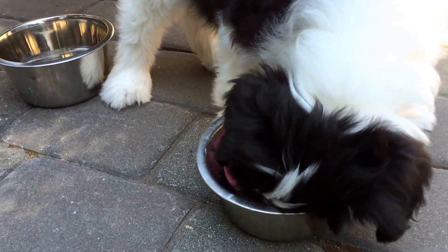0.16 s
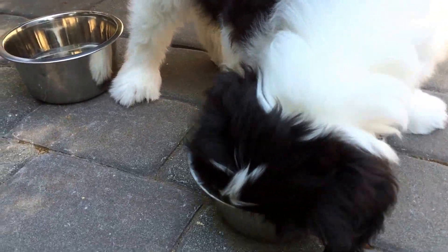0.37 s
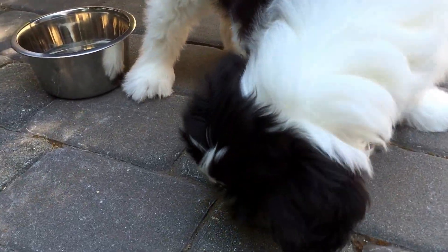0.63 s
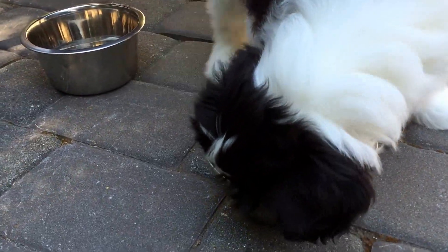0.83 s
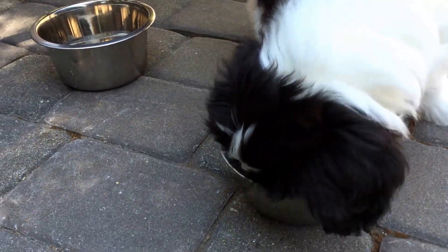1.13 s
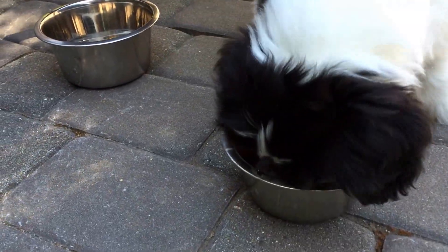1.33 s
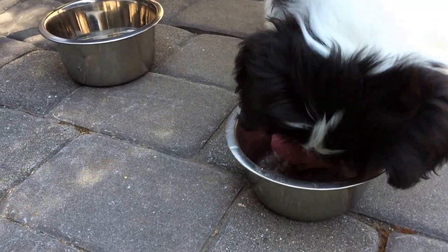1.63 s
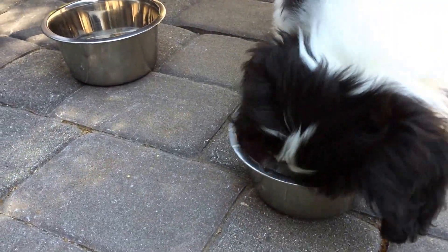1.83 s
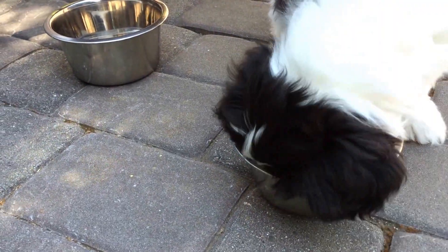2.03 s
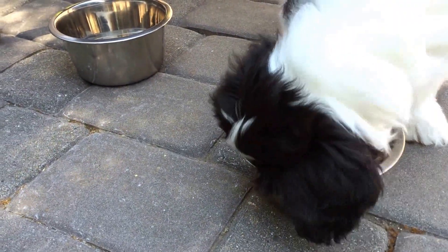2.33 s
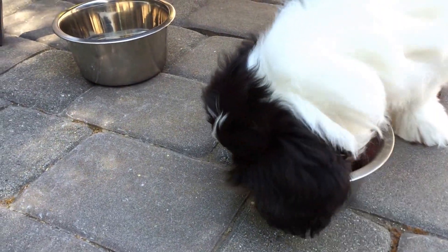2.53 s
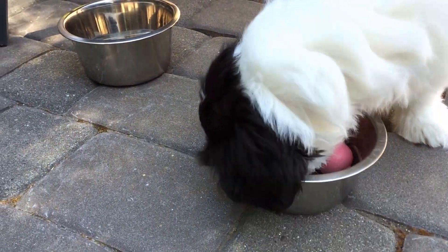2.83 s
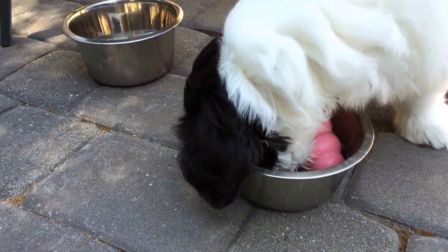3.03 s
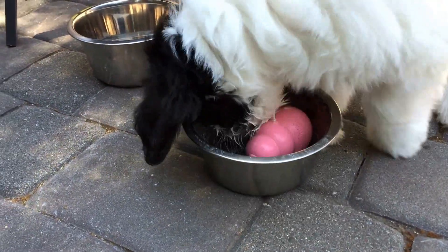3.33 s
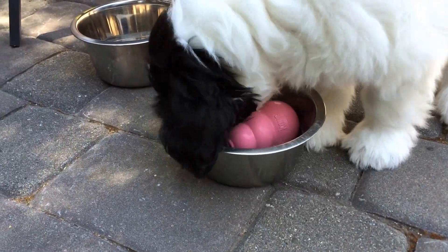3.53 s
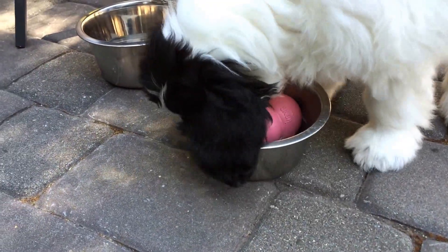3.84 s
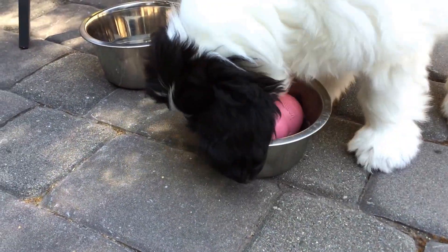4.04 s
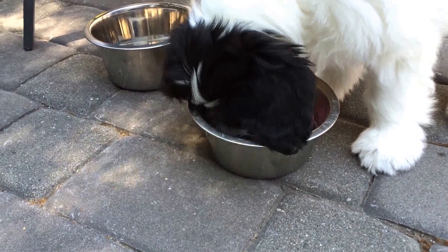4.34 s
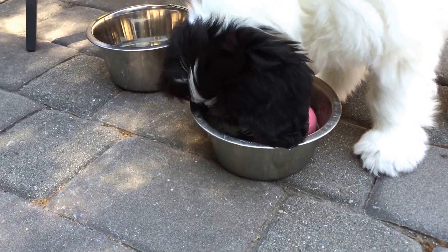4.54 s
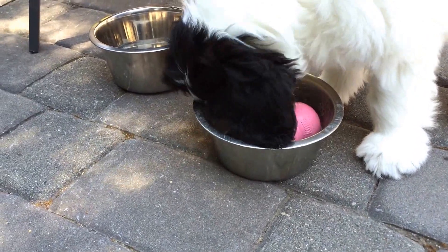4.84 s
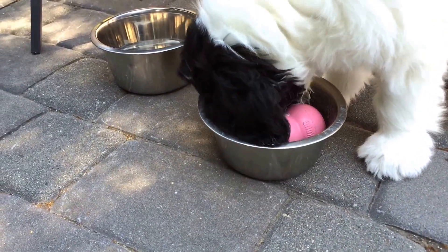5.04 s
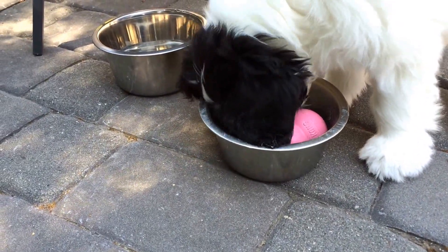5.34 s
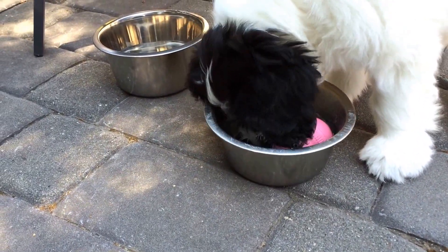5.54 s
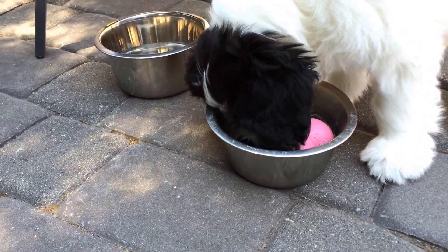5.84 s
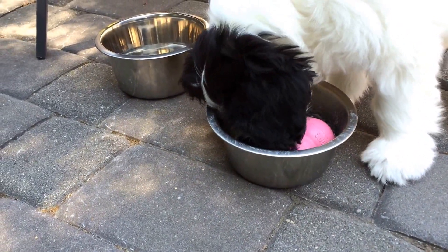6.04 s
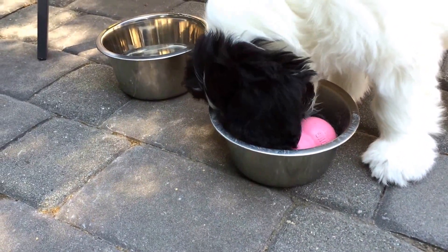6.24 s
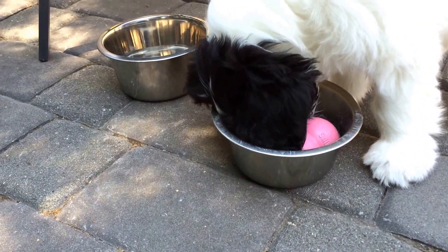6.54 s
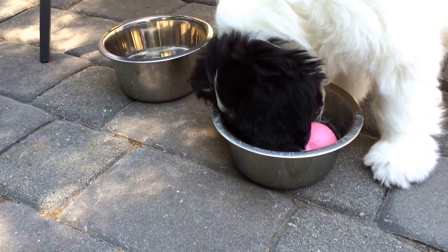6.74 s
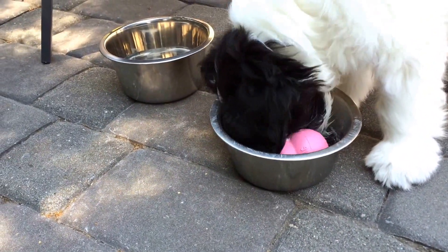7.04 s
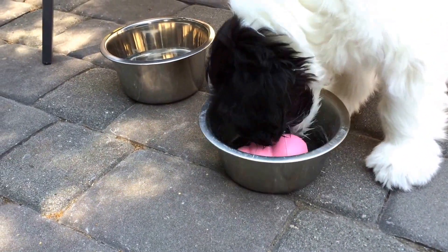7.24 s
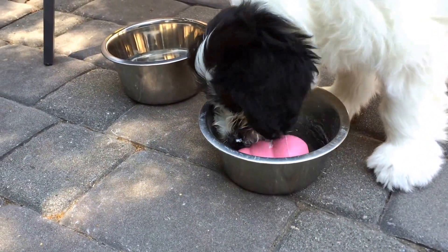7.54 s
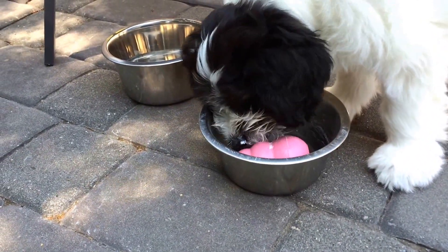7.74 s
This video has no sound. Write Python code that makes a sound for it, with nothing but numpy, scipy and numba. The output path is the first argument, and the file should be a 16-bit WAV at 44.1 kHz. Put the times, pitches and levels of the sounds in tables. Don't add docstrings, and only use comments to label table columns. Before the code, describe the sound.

Outdoors, a puppy's metal food bowl skids and chatters on paving, a rubber toy thudding inside it, quiet gaps between bursts of scraping.

```python
import sys
import numpy as np
from scipy import signal
from scipy.fft import rfft, irfft
from scipy.io import wavfile
from scipy.ndimage import uniform_filter1d
from numba import njit

SR = 44100
rng = np.random.default_rng(int(sys.argv[2]) if len(sys.argv) > 2 else 0)


def natural_amplitude(level_db):
    exponent = np.asarray(level_db, float) / 20
    return 10 ** exponent


def store_wav(level_fs):
    pcm = np.round(np.clip(np.atleast_2d(level_fs), -1, 1) * 32767)
    wavfile.write(sys.argv[1], SR, pcm.T.astype(np.int16))


N = 347508


def level(x, db):
    return x * natural_amplitude(db) / np.sqrt(np.mean(x ** 2))


def walks(count, rate, hop):
    k = max(int(SR / rate / hop), 1)
    w = rng.standard_normal((count, N // hop + 1))
    w = uniform_filter1d(uniform_filter1d(w, k, axis=1), k, axis=1)
    return w / w.std()


def filtered_noise(gain):
    return irfft(rfft(rng.standard_normal(N)) * gain, N)


def grit(rate, spread_db, smooth):
    size_db = np.minimum(spread_db * rng.exponential(size=N), 10)
    clicks = (rng.random(N) < rate / SR) * natural_amplitude(size_db) * rng.standard_normal(N)
    return level(level(clicks, 0) + smooth * rng.standard_normal(N), 0)


def thuds(table, db, push_s, upper, upper_db):
    out, u = np.zeros(N), np.arange(8192) / SR
    for s, peak_db, hz, t60 in table:
        tone = np.sin(2 * np.pi * hz * u) + natural_amplitude(upper_db) * np.sin(2 * np.pi * upper * hz * u)
        decay = natural_amplitude(db + peak_db - 60 * u / max(t60, .005))
        i = int(s * SR)
        out[i:i + len(u)] += decay * (1 - np.exp(-u / push_s)) * tone
    return out


# [f/Hz, level/dB per Hz]
MURMUR_TILT = [(15, -31.5), (25, -6.5), (153, -4), (236, -8), (285, -13.5), (373, -18.5), (659, -25),
               (1070, -22), (1230, -28), (1330, -23.5), (2220, -31.5), (3620, -42.5), (14000, -52.5),
               (16000, -55.5)]
# [f/Hz, width/Hz, level/dB]
MOTOR_HUM = [(86.9, 6.5, -58.5), (126.1, 7.1, -60.5)]


def outdoors():
    f = np.fft.rfftfreq(N, 1 / SR) + 1
    hz, db = np.transpose(MURMUR_TILT)
    tilt = natural_amplitude(np.interp(np.log(f), np.log(hz), db))
    t, swell, murmur = np.arange(N) / 256, walks(1, .6, hop=256)[0], np.zeros(N)
    for centre in np.arange(4.5, 14.5, .5):
        band = filtered_noise(tilt * np.sqrt(np.clip(1 - abs(np.log2(f) - centre) * 2, 0, 1)))
        wander_db = 0.34 * swell + 1.1 * walks(1, 11, hop=256)[0]
        murmur += band * natural_amplitude(np.interp(t, np.arange(len(swell)), wander_db))
    hum = np.zeros(N)
    for hz, width_hz, db in MOTOR_HUM:
        hum += level(filtered_noise(1 / (1 + ((f - hz) / (width_hz / 2)) ** 2)), db)
    return level(murmur, -52) + hum


# [nearest t/s, level/dB, half-loudness time/s]
PASSING_TRAFFIC = [
    (.8, -54, 0.18),
    (1.502, -47.5, 0.15),
    (3.3, -55, 1),
    (5.05, -64, 0.1),
    (6.58, -46.5, 0.19),
    (7.6, -59.5, 0.75),
]
# [t/s, level/dB]
BASE_JOLTS = [(.55, -46), (2.622, -40.5), (2.84, -43), (2.91, -37), (3.07, -37.5), (3.43, -39.5),
              (3.53, -43), (3.92, -48), (4.11, -44), (4.39, -46), (5.56, -36.5), (7.13, -46)]


def groan():
    t = np.arange(N) / SR
    rise_db_s, fall_db_s = 492.5, 222
    jolts = sum(natural_amplitude(db - np.maximum(rise_db_s * (s - t), fall_db_s * (t - s))) for s, db in BASE_JOLTS)
    swells = sum(natural_amplitude(db) / (1 + ((t - s) / half) ** 2) for s, db, half in PASSING_TRAFFIC)
    rub = signal.sosfilt(signal.butter(3, [250, 530], "band", fs=SR, output="sos"), grit(600, 1.5, 0.82))
    return level(rub, -10.0) * (jolts + swells)


# [t/s, peak level/dB, ring f/Hz, t60/s]
BUMP_EVENTS = [
    (2.5915, -27, 100, 0.05),
    (2.624, -29, 96, 0.029),
    (2.6492, -27, 125, 0.06),
    (2.691, -37.5, 80.5, 0.06),
    (2.719, -35, 96, 0.059),
]


def phone_bumps():
    boom = thuds(BUMP_EVENTS, 2.5, push_s=0.0011, upper=3.04, upper_db=-18)
    return np.roll(boom, -150)


# [t/s, peak level/dB, ring f/Hz,
# t60/s]
TOY_KNOCKS = [(0.541, -14, 765, 0.019), (0.607, -17, 680, 0.034), (.541, -20, 1130, .015),
              (2.592, -22, 930, 0.022), (2.846, -24.5, 530, 0.061), (2.902, -16.5, 760, 0.026),
              (2.919, -24.5, 923, 0.042), (2.927, -23, 715, .02), (3.424, -34, 545, 0.059),
              (3.516, -22, 415, 0.085), (3.594, -11, 763, 0.019), (4.1105, -20, 600, 0.045),
              (4.117, -23, 1020, .02), (4.136, -26.5, 556, 0.039), (4.1362, -18, 1100, 0.018),
              (5.418, -29.5, 625, 0.015), (7.126, -23.5, 334, 0.04), (2.0992, -28, 800, .025),
              (2.0828, -37, 570, .025), (2.1362, -35, 600, .035), (7.1268, -19, 1400, .022)]


def toy_knocks():
    return thuds(TOY_KNOCKS, -4, push_s=0.0015, upper=1.3, upper_db=-13.0)


# [t/s, peak level/dB, ring f/Hz, t60/s]
CLEAN_TAPS = [(1.1056, -17, 1596, .072), (1.1056, -30, 1624, .17), (1.1056, -35, 3052, .07),
              (1.1056, -40, 8520, .1), (1.648, -35, 1710, .05), (2.477, -27, 1595, .09),
              (.432, -30, 2250, .04), (6.479, -33, 1200, .03), (6.86, -33, 1150, .05),
              (6.883, -25, 1175, .05), (7.262, -26, 600, .06), (3.594, -27, 3300, .015),
              (3.594, -27, 2100, .015), (1.1052, -27, 2540, .035), (4.11, -25, 1900, .035),
              (4.99, -44, 3150, .018)]


def clinks():
    return thuds(CLEAN_TAPS, -4, push_s=0.0014, upper=1.8, upper_db=-48)


# [start t/s, length/s, level/dB, f/Hz]
LOW_SONGS = [(0.076, 0.042, -45, 1035), (0.122, 0.079, -44, 1154), (0.13, 0.038, -39, 830),
             (0.184, 0.019, -49.5, 700), (0.196, 0.029, -51, 840), (0.269, 0.046, -42, 833),
             (0.272, 0.069, -50, 1225), (0.304, 0.063, -43.5, 683), (0.572, 0.028, -47, 1015),
             (0.704, 0.022, -55.5, 1160), (1.045, 0.062, -56, 930), (2.476, 0.017, -53, 1120),
             (2.56, 0.031, -47.5, 960), (2.798, 0.03, -49, 890), (2.976, 0.023, -56, 880),
             (3.06, 0.03, -39.5, 900), (3.183, 0.035, -40, 964), (3.201, 0.083, -49, 560),
             (3.319, 0.15, -48, 690), (3.348, 0.045, -37, 954), (3.643, 0.03, -57, 610),
             (3.94, 0.058, -54.5, 1080), (4.196, 0.036, -52, 580), (4.297, 0.031, -51.5, 700),
             (4.404, 0.019, -49, 625), (5.543, 0.028, -43.5, 1088), (5.572, 0.022, -40.5, 660),
             (5.582, 0.038, -42.5, 1150), (6.239, 0.02, -45.5, 1240), (6.595, 0.028, -54, 1200)]
# [start t/s, length/s, level/dB, f/Hz]
MID_SONGS = [(0.098, 0.042, -39.5, 1490), (0.12, 0.042, -40, 1680), (0.246, 0.032, -44, 1700),
             (0.309, 0.04, -37.5, 1598), (0.373, 0.039, -46, 1804), (0.433, 0.02, -44.5, 1350),
             (0.491, 0.03, -55, 1830), (0.543, 0.028, -44, 1690), (0.581, 0.041, -54, 1680),
             (0.675, 0.03, -49.5, 1540), (0.846, 0.02, -48.5, 1585), (0.884, 0.022, -53.5, 1490),
             (2.102, 0.006, -53, 1576), (2.5, 0.025, -44.5, 1430), (2.806, 0.022, -42, 1517),
             (2.838, 0.024, -43.5, 1550), (3.131, 0.023, -41, 1440), (3.137, 0.027, -35.5, 1657),
             (3.19, 0.047, -37, 1535), (3.257, 0.026, -38, 1560), (3.293, 0.076, -44, 1380),
             (3.304, 0.025, -39, 1650), (3.36, 0.052, -43, 1930), (3.402, 0.029, -39.5, 1703),
             (3.418, 0.036, -45.5, 1930), (3.45, 0.037, -43.5, 1790), (3.488, 0.035, -46.5, 1600),
             (3.522, 0.021, -47, 1930), (3.582, 0.045, -45.5, 1450), (3.618, 0.024, -40.5, 1630),
             (4.298, 0.03, -55, 1940), (4.421, 0.026, -49, 1610), (5.554, 0.021, -44, 1460),
             (5.571, 0.033, -40, 1710), (7.206, 0.032, -40, 1537), (7.228, 0.063, -41, 1670),
             (7.244, 0.03, -44, 1870), (7.289, 0.032, -43, 1406)]
# [start t/s, length/s, level/dB, f/Hz]
WALL_SONGS = [(0.08, 0.026, -51, 3320), (0.089, 0.028, -43, 3000), (0.094, 0.028, -41, 2360),
              (0.122, 0.03, -40, 2090), (0.277, 0.03, -44.5, 3030), (0.303, 0.032, -42, 2570),
              (0.311, 0.024, -48, 3520), (0.335, 0.032, -54, 3940), (0.349, 0.021, -46, 2500),
              (0.392, 0.026, -46, 2460), (0.411, 0.026, -55, 2780), (0.429, 0.022, -54, 3700),
              (0.462, 0.022, -56, 2500), (0.461, 0.03, -52, 3850), (3.143, 0.054, -46, 3110),
              (3.159, 0.081, -44.5, 3660), (3.253, 0.056, -47, 2970), (3.306, 0.021, -46, 3050),
              (3.348, 0.022, -50, 3040), (3.402, 0.02, -44, 3470), (3.42, 0.03, -53, 3100),
              (3.448, 0.021, -49, 3290), (3.497, 0.012, -52, 3400), (3.525, 0.015, -54, 3670),
              (3.596, 0.021, -46, 2070), (3.624, 0.026, -50, 2260), (7.11, 0.006, -53, 2250),
              (5.555, 0.02, -54, 2520), (5.568, 0.025, -46.5, 3060), (5.581, 0.026, -51, 2350),
              (6.883, 0.028, -55, 3980), (7.2, 0.058, -48, 2070), (7.238, 0.028, -44.5, 2315),
              (7.272, 0.021, -40, 2690)]
# [start t/s, length/s, level/dB, f/Hz]
THIN_SONGS = [(2.6, .11, -60, 1930), (4.86, .13, -64, 7100), (4.99, .14, -61.5, 7100),
              (5.0, .13, -58, 1880), (4.91, .04, -55, 1200), (2.1, .03, -56, 560), (4.815, .06, -64, 7100),
              (2.775, 0.026, -55, 3700), (4.435, .05, -56, 1600), (7.27, .03, -42.5, 850),
              (3.11, 0.028, -41, 1380), (.425, .025, -43.5, 2300)]


def sings():
    out, u = np.zeros(N), np.arange(8192) / SR
    t60_s, stretch, lead_s = 0.061, 1.08, .005
    for table in (LOW_SONGS, MID_SONGS, WALL_SONGS, THIN_SONGS):
        for s, length, db, hz in table:
            noise = rng.standard_normal(len(u))
            force = noise * abs(noise) * np.sin(np.pi * np.clip(u / (length * stretch), 0, 1))
            pole = np.exp(2j * np.pi * hz / SR - np.log(1000) / (t60_s * SR))
            swing = signal.lfilter([1], [1, -pole], force).imag
            loudest = np.sqrt(uniform_filter1d(swing ** 2, 800).max())
            i = int((s - lead_s) * SR)
            out[i:i + len(u)] += natural_amplitude(db) * swing / loudest
    return out


# [start t/s, length/s, rim level/dB, body minus rim level/dB, freest body ring f/Hz]
FREE_SLIDES = [(-.06, 0.12, -46.5, 2, 785), (.055, 0.17, -37.5, 2.5, 850), (.17, 0.14, -49.5, 7, 1110),
               (.245, 0.13, -41.5, 2, 1640), (.29, 0.12, -40, 1, 790), (.38, 0.15, -39, -2, 1390),
               (.67, 0.095, -58.5, 10, 1360), (.83, 0.084, -56, 9.5, 1500), (.99, 0.061, -65, 12, 1210),
               (4.188, 0.045, -48.5, 6, 730), (5.538, 0.077, -41.5, 4.5, 1150), (5.57, 0.07, -49, 8.5, 734),
               (5.83, 0.061, -63.5, 11, 810), (6.27, 0.088, -64.5, 6, 880), (6.47, 0.045, -64, 11, 1180),
               (6.56, .13, -59.5, 8.5, 1200), (6.855, 0.076, -48.5, 7.5, 1260),
               (7.135, 0.085, -51, 12, 1300), (7.175, 0.12, -41, 6, 1360), (7.22, 0.077, -35, 0, 600),
               (7.255, 0.071, -39.5, 5, 1380)]
# [start t/s, length/s, rim level/dB, body minus rim level/dB, freest body ring f/Hz]
BRUSHED_SLIDES = [(1.8, 0.1, -59.5, 5, 1105), (2.4, 0.071, -62.5, 10, 1410), (2.459, 0.11, -45, 4.5, 1370),
                  (2.8, 0.099, -43.5, 5, 1080), (2.97, 0.079, -60.5, 8, 890), (3.1, 0.13, -35, -1.3, 1490),
                  (3.17, 0.1, -36, 3.5, 1490), (3.23, 0.16, -35, 1, 1390), (3.33, 0.1, -33.5, -0.5, 1216),
                  (3.389, 0.12, -38.5, -2, 1620), (3.589, 0.08, -36.5, -1.5, 1030),
                  (3.78, 0.14, -66.5, 2, 740), (4.098, 0.068, -45, 6, 780), (4.37, 0.1, -51.5, 5.5, 1210),
                  (4.9, 0.23, -61, 5, 980), (6.2, 0.054, -58.5, 16.5, 630), (6.225, 0.058, -54, 6, 1140),
                  (7.42, 0.066, -64, -8, 830)]
# [start t/s, length/s, rim level/dB, body minus rim level/dB, freest body ring f/Hz]
PRESSED_SLIDES = [(.49, 0.145, -39.5, -4.5, 800), (.56, 0.045, -52, -3, 1010), (.6, 0.082, -50.5, 9.5, 750),
                  (1.04, 0.1, -53, 6, 1290), (1.2, 0.087, -64, 8, 930), (2.081, 0.042, -53, 3, 800),
                  (2.134, 0.022, -57, 5, 754), (2.52, 0.13, -46, 6, 791), (2.68, 0.068, -63, 1, 800),
                  (2.74, 0.12, -48, 1, 1140), (2.88, 0.082, -44.5, 3, 710), (3.04, 0.19, -37.5, -3, 930),
                  (3.48, 0.25, -38, -2.5, 764), (3.67, 0.12, -54, 4, 980),
                  (3.925, 0.075, -45.5, -6.5, 1050), (3.96, 0.12, -55, -3, 1040),
                  (4.261, 0.054, -52.5, -2, 780), (4.285, 0.076, -42, -4, 790), (4.81, 0.21, -60, 6, 864),
                  (5.02, 0.125, -53.5, 3, 840), (6.085, 0.067, -59.5, 8, 725),
                  (7.61, 0.095, -53.5, 3, 1090)]


def strokes():
    power, focus, weight = np.zeros((3, N)), np.zeros(N), np.zeros(N)
    t = np.arange(N) / SR
    for table, wall_db, lean in ((FREE_SLIDES, -2.5, 0.88), (BRUSHED_SLIDES, -7.5, 0.77),
                                 (PRESSED_SLIDES, -16, 0.72)):
        for s, length, rim_db, body_db, hz in table:
            span = slice(max(int(s * SR), 0), int((s + length) * SR))
            speed = abs(np.sin(np.pi * np.clip((t[span] - s) / length, 0, 1) ** lean))
            part_gain = natural_amplitude(rim_db + np.array([[0], [body_db], [wall_db]]))
            push = (part_gain * speed ** 1.11) ** 2
            power[:, span] += push
            strength = (1e5 * push[1]) ** 4
            focus[span] += hz * strength
            weight[span] += strength
    judder_db = 0.84 * walks(1, 120, hop=32) + 2.05 * walks(3, 90, hop=32)
    judder = np.repeat(natural_amplitude(judder_db), 32, axis=1)[:, :N]
    grains = np.array([grit(3000, 2.6, .75) for part in power])
    focus_hz = (focus + 1e-27) / (weight + 1e-30)
    return np.sqrt(power) * judder * grains, focus_hz[::256]


# [t/s, rim peak level/dB, body minus rim level/dB, rattle t60/s]
TEETH = [(1.1047, -11.5, -12, 0.034), (2.0823, -33, 3, .012), (2.1361, -33, 5, 0.012),
         (2.9027, -24.5, 10, 0.016), (3.0493, -31, -10, .03), (3.359, -10.5, -20, 0.028),
         (3.533, -10, -5.5, 0.014), (3.767, -33.5, -15, 0.0098), (3.8882, -22, -19, 0.034),
         (3.931, -27, -15, .015), (4.8776, -33, -13, 0.015), (4.8886, -35, -11, .013),
         (5.0424, -34.5, -9, 0.015), (5.0835, -36, -6, .011), (5.4956, -51, -4, .011),
         (5.54, -36, 10, 0.016), (6.8822, -45.5, 15, .011), (7.1259, 1, -11, 0.01),
         (7.5863, -41, -13, 0.01), (7.63, -23, -14, 0.012), (7.7246, -46, -5, .011)]
# [t/s, rim peak level/dB, body minus rim level/dB, rattle t60/s]
STONE_EDGES = [(0.259, -28, -12, 0.047), (1.3258, -46.5, 6, 0.011), (1.7253, -44, 11, 0.012),
               (2.681, -41, -3, 0.037), (2.807, -23.5, -1, 0.033), (3.8216, -43.5, -8, 0.026),
               (4.1094, -19, 10.5, 0.013), (4.1355, -24, 12, 0.015), (6.788, -41, 7.5, 0.005),
               (7.489, -46, -7, 0.0084), (7.7794, -58, 2, 0.013)]
# [t/s, rim peak level/dB,
# body minus rim level/dB, rattle t60/s]
FURTHER_TICKS = [(1.447, -50, 12, .011), (1.605, -51, 8, .012), (2.1425, -36, 5, .015), (1.86, -38.5, 9, 0.013),
                 (2.0992, -29.5, 6, 0.028), (4.56, -57, -9, .012), (1.1048, -17, -4, 0.04),
                 (5.061, -38, -10, .015), (6.495, -46, 1.5, .011), (6.69, -46, -8, .011), (2.358, -49, -9, .012),
                 (3.6265, -20, -8, .02), (2.598, -40, 6, .01), (3.4549, -26, 0, .015), (3.429, -27, 4, .008),
                 (3.9, -26.5, 2, .008), (3.517, -36, 2, .008), (3.5926, -26, 9, 0.013), (.606, -27, -4, .025),
                 (5.552, -35, 14, .015), (4.408, -40, 6, .01), (4.431, -32, 7, 0.011), (4.32, -48, 2, .01),
                 (4, -46, 2, .01), (4.12, -26, 10, .012), (4.1495, -36, 10, .015)]
# [t/s, rim peak level/dB, body minus rim level/dB, rattle t60/s]
KIBBLE = [(0.9514, -46.5, 9, 0.013), (1.002, -49, 3, 0.0099), (1.6477, -41, 2, 0.02),
          (4.1942, -35.5, 5.5, 0.013), (4.637, -44, -16, 0.013), (5.438, -57, -1.5, 0.013),
          (5.946, -46, -12, 0.0096), (6.479, -43, 7, 0.0087), (7.0847, -48, 0, 0.01),
          (7.106, -36.5, 1, 0.0063), (7.3644, -48, 5, 0.0094)]


def contacts():
    ticks, u = np.zeros((3, N)), np.arange(2048) / SR
    hits = []
    for table, wall_db in ((TEETH, -20.5), (STONE_EDGES, -5), (KIBBLE, 5.5)):
        hits += [(*row, wall_db) for row in table]
    hits.sort()
    noises = rng.standard_normal((len(hits), len(u)))
    hits += [(*row, -5) for row in FURTHER_TICKS]
    noises = np.concatenate([noises, noises[:, ::-1]])
    for (s, rim_db, body_db, t60, wall_db), noise in zip(hits, noises):
        rattle = noise * (natural_amplitude(-60 * u / max(t60, .002)) + natural_amplitude(-3 - 60 * u / .003))
        part_gain = natural_amplitude(-7.5 + rim_db + np.array([[0], [body_db], [wall_db]]))
        i = int((s + 0.00064) * SR)
        ticks[:, i:i + len(u)] += part_gain * rattle
    return ticks


@njit
def ring(force, poles, share):
    out = np.zeros(len(force))
    for m in range(len(poles)):
        z = 0j
        for i in range(len(force)):
            z = z * poles[m] + (force[i] + 1e-18) * share[m, i >> 8]
            out[i] += z.imag
    return out


def metal(slide, ticks, modes, crowd, count, shift_db, shift_rate, focus_hz=None):
    lo, hi, crowd_db, slope_db = crowd
    extra = lo + (hi - lo) * (np.arange(count) + rng.random(count)) / count
    main = np.array(modes, float).T
    hz = np.append(main[0], extra)
    db = np.append(main[1], crowd_db + slope_db * np.log2(extra / lo))
    t60 = np.clip(np.append(main[2], .012 + 26 / extra), .004, .11)
    poles = np.exp(2j * np.pi * hz / SR - np.log(1000) / (t60 * SR))
    share = natural_amplitude(db[:, None] + shift_db * walks(len(hz), shift_rate, hop=256))
    if focus_hz is not None:
        octaves = abs(np.log2(hz[:, None] / focus_hz))
        share *= natural_amplitude(-5.5 * np.minimum(octaves, 1.5) + 5 * np.exp(-(octaves / .15) ** 2))
    share *= np.sqrt(2 * (1 - abs(poles[:, None]) ** 2) / np.sum(share ** 2, axis=0))
    share *= rng.choice([-1., 1.], (len(hz), 1))
    ring_db, rub_db, crack_db = -4, -7, -3.5
    sound = ring(slide + natural_amplitude(ring_db) * ticks, poles, share)
    sound += natural_amplitude(rub_db) * slide + natural_amplitude(crack_db) * ticks
    if focus_hz is not None:
        low = signal.sosfiltfilt(signal.butter(4, 630, fs=SR, output="sos"), sound)
        sound -= (1 - natural_amplitude(-14)) * low * (np.arange(N) < .5 * SR)
    return signal.sosfilt(signal.butter(5, [lo * 0.96, hi * 1.17], "band", fs=SR, output="sos"), sound)


# [f/Hz, level/dB, t60/s]
BODY_MODES = [(577.5, 1, 0.14), (652, 6, 0.052), (800, 1, 0.019), (903, 0.5, 0.045), (1020, -12.5, 0.034),
              (1158, -6, 0.034), (1490, -5.5, 0.027), (1600, 9.5, 0.0063), (1678, 0.5, 0.032),
              (1730, -4.5, 0.027), (1870, -18, 0.13), (1950, -6.5, 0.12)]
# [lowest f/Hz, highest f/Hz, level/dB, slope/dB per octave]
BODY_LESSER = (500.5, 2152.5, -16, 4)


def body(slide, ticks, focus_hz):
    return metal(slide, ticks, BODY_MODES, BODY_LESSER, count=12, shift_db=4.0, shift_rate=30, focus_hz=focus_hz)


# [f/Hz, level/dB, t60/s]
WALL_MODES = [(2300, -2, 0.02), (2625, -4, 0.044), (3130, -7, 0.12), (3340, -11.5, 0.094),
              (3567, 8, 0.0065)]
# [lowest f/Hz, highest f/Hz, level/dB, slope/dB per octave]
WALL_LESSER = (2309, 4604.5, -5.5, -1)


def wall(slide, ticks):
    return metal(slide, ticks, WALL_MODES, WALL_LESSER, count=24, shift_db=2.5, shift_rate=30)


# [f/Hz, level/dB, t60/s]
RIM_MODES = [(5350, -27.5, 0.03), (5430, -5.5, 0.02), (5795, 5.5, 0.012), (6300, -9.5, 0.015),
             (7083, 8.5, 0.0067), (8140, -4.5, 0.063), (10700, -28, 0.071)]
# [lowest f/Hz, highest f/Hz, level/dB, slope/dB per octave]
RIM_LESSER = (4852, 15504.5, -6, -2.5)


def rim(slide, ticks):
    soft = signal.butter(1, 7000, fs=SR, output="sos")
    slide, ticks = signal.sosfilt(soft, slide), signal.sosfilt(soft, ticks)
    return metal(slide, ticks, RIM_MODES, RIM_LESSER, count=110, shift_db=5.5, shift_rate=35)


def bowl():
    slide, focus_hz = strokes()
    ticks = contacts()
    bright = rim(slide[0], ticks[0])
    low = natural_amplitude(-4.5) * body(slide[1], ticks[1], focus_hz)
    middle = natural_amplitude(-2) * wall(slide[2], ticks[2])
    return bright + low + middle


def patio(near, db, t60):
    u = np.arange(4096) / SR
    tail = rng.standard_normal(len(u)) * natural_amplitude(-60 * u / t60) * np.clip(u / 0.0053, 0, 1)
    return natural_amplitude(db) * signal.fftconvolve(near, tail / np.sqrt(np.sum(tail ** 2)))[:N]


def scene():
    near = bowl() + toy_knocks() + clinks()
    far = groan() + outdoors()
    near = near + sings()
    return (near + phone_bumps() + far + patio(near, -11.5, t60=0.11))[None]


def band_limit(x):
    return signal.sosfilt(signal.butter(12, 16490, fs=SR, output="sos"), x)


def record(dry):
    thin = signal.sosfilt(signal.butter(3, 45, "high", fs=SR, output="sos"), dry)
    thin = signal.sosfilt(signal.cheby2(10, 22, 15600, fs=SR, output="sos"), thin)
    return band_limit(np.tanh(1.246 * thin) / 1.141)


dry = scene()
out = record(dry)
store_wav(out)
```